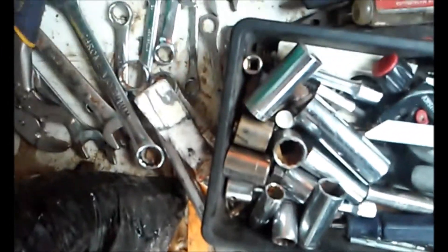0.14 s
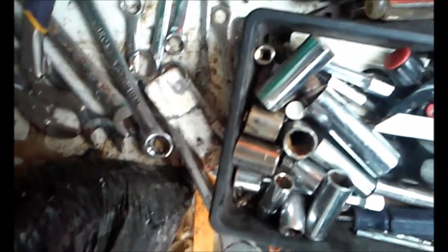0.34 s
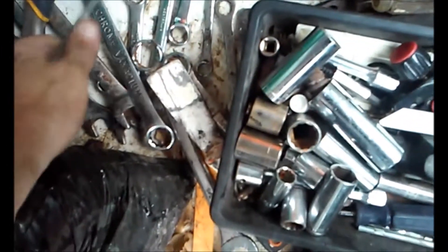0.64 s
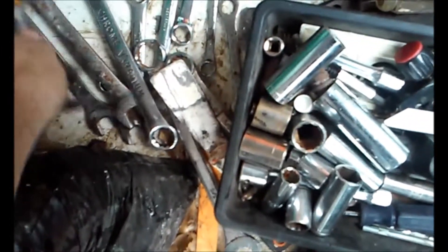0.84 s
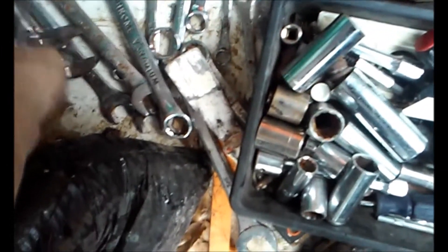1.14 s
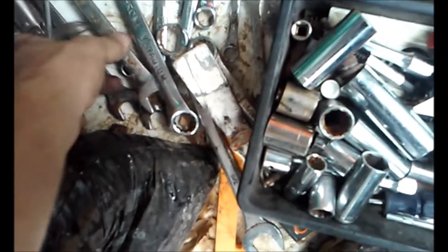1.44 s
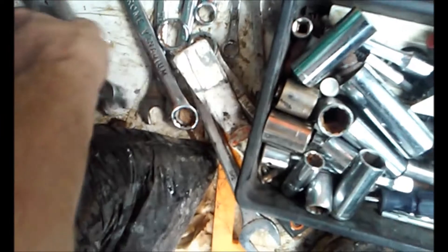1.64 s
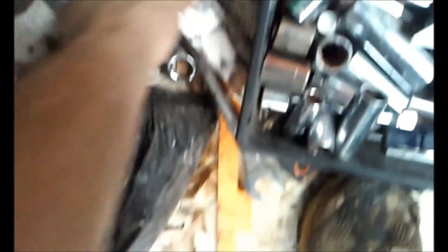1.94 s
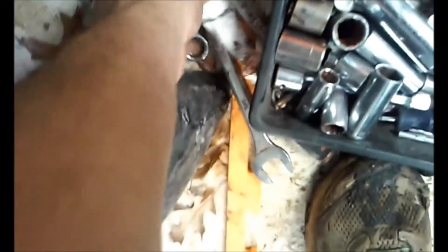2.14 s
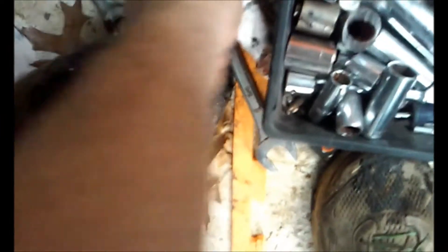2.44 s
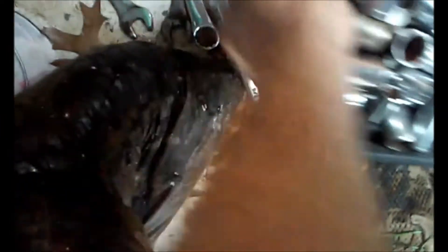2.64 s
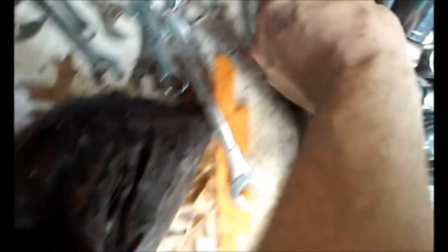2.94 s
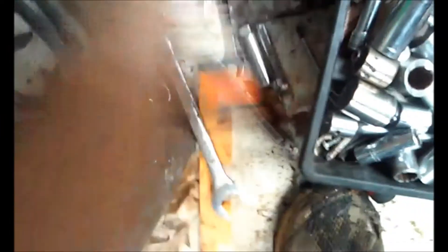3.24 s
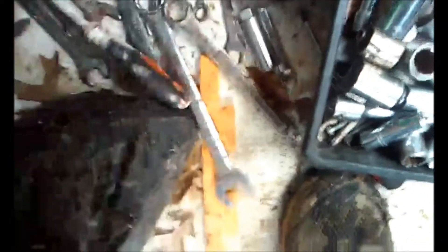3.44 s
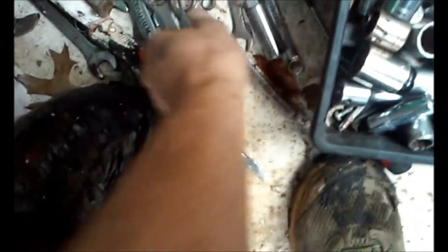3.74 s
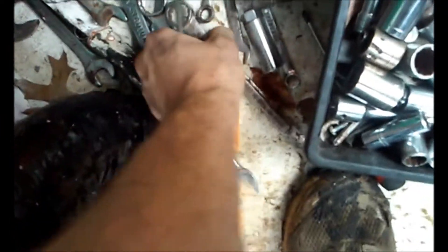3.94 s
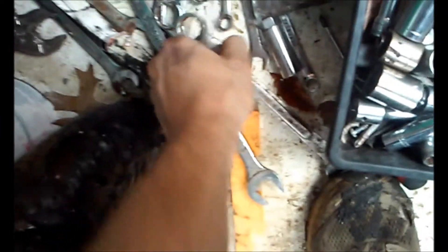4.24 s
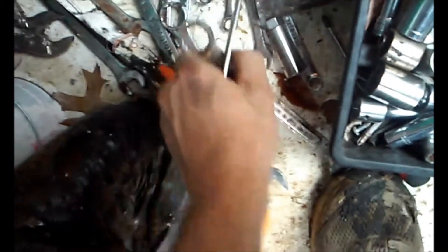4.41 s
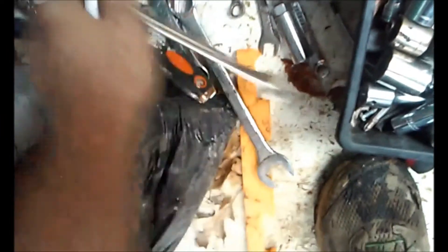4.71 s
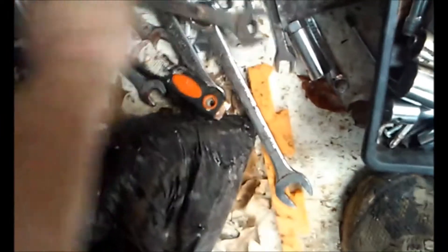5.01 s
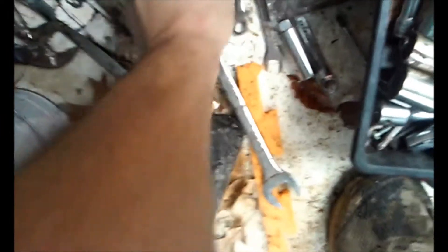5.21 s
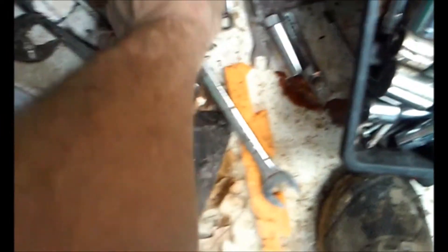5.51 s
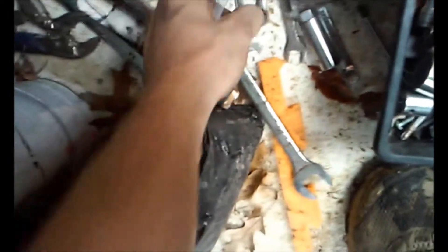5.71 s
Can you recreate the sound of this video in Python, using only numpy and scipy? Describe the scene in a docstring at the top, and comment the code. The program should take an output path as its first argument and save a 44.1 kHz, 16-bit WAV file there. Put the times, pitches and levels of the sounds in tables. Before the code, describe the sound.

After a dull wooden knock, metal tools jingle sparsely, crash against a shoved plastic tray, then ring louder in dense bursts towards the end.

```python
"""Rummaging through steel tools

A hand sets down a wooden block, then rummages through steel wrenches and a plastic tray of sockets on a garage floor.
Clinks are decaying sine modes plus chatter of the pile; the block, knocks and thumps are noise bursts through
resonances; the tray grinds with coloured grit and dragged sockets squeal in gliding bands.
A small mono microphone gates the quiet moments and overloads on the loudest clinks."""
import sys
import numpy as np
from scipy import signal
from scipy.fft import rfft, irfft
from scipy.io import wavfile
from scipy.ndimage import minimum_filter1d

SR = 44100
rng = np.random.default_rng(int(sys.argv[2]) if len(sys.argv) > 2 else 0)


def wrap_up_sound(samples):
    """Save the sound to the file named by the first command line argument, as 16-bit audio."""
    columns = np.atleast_2d(samples).T
    # keep every value between -1 and 1, then stretch to whole-number steps
    tamed = np.clip(columns, -1, 1)
    steps = np.round(tamed * 32767).astype(np.int16)
    wavfile.write(sys.argv[1], SR, steps)


N = 258867

# knocks on tray and floor: start_s, level_db, body_pitch_hz, t60_s
KNOCK_EVENTS = [(0.756, -30, 617, 0.065), (0.76, -25, 1780, 0.27), (0.9, -20, 1440, 0.066),
                (1.577, -25.5, 2560, 0.5), (1.692, -22.5, 1310, 0.16), (1.872, -9, 2840, 0.27),
                (1.902, -25, 2650, 0.05), (2.127, -16, 2640, 0.03), (2.155, -3, 825, 0.062),
                (2.212, -18, 2000, 0.057), (2.276, -15.5, 1185, 0.028), (2.352, -15, 1080, 0.033),
                (2.374, -22, 1570, 0.089), (2.385, -4, 896, 0.039), (2.423, -22, 1300, 0.019),
                (2.473, -26.5, 1505, 0.031), (2.502, -25, 1300, 0.041), (2.526, -26.5, 1200, 0.045),
                (2.551, 2, 1110, 0.074), (2.591, -8.5, 1490, 0.18), (2.616, -8, 1500, 0.038),
                (2.64, -8.5, 780, 0.08), (2.655, -12.5, 1820, 0.027), (2.694, -19.5, 1480, 0.085),
                (2.738, 9, 820, 0.16), (2.764, -5, 850, 0.29), (2.787, 9, 630, 0.066),
                (2.837, 5.5, 1650, 0.043), (2.849, -3, 1500, 0.039), (2.864, 9.5, 750, 0.025),
                (2.891, 2.5, 1820, 0.017), (2.933, 0.5, 1750, 0.027), (3.007, -9, 1670, 0.035),
                (3.024, -8, 2550, 0.033), (3.037, -12.5, 800, 0.071), (3.0603, 3, 1090, 0.078),
                (3.093, -3.5, 1816, 0.023), (3.142, -10.5, 1600, 0.052), (3.347, -23, 2430, 0.15),
                (3.445, -18.5, 1224, 0.13), (3.466, 0.5, 1905, 0.045), (3.573, -9.5, 2510, 0.042),
                (3.94, -35.5, 1100, 0.13), (4.007, -16.5, 1742, 0.061), (4.618, -2, 742, 0.074),
                (4.865, -8, 1750, 0.44), (4.897, -5, 1790, 0.042), (5.319, -4.5, 1800, 0.065),
                (5.37, -14.5, 1740, 0.047), (5.44, -21, 2500, 0.11), (5.771, -17, 940, 0.017),
                (5.819, -4, 2180, 0.18)]
# colour of the plastic tray: freq_hz, relative_level_db
TRAY_COLOUR = [(150, -66), (250, -27.5), (379, -36.5), (480, -12.5), (595, 4.5), (886, 2.5), (1190, 5),
               (1440, 6.5), (2640, 4.5), (4370, -16), (6860, -20.5), (15800, -35.5)]
# colour of garage air and microphone noise: freq_hz, relative_level_db
HUSH_COLOUR = [(15, -33), (25, 0.5), (268, -8.5), (307, -22), (436, -22), (1550, -16), (3390, -22),
               (8250, -14.5), (15800, -25)]


def amp(db):
    """Amplitude factor of a level in dB."""
    return 10 ** (np.asarray(db) / 20)


def rms_one(x):
    """Scale to rms 1."""
    return x / np.sqrt(np.mean(x ** 2) + 1e-20)


def coloured(x, spectrum):
    """Minimum-phase filter with the given (Hz, dB) shape: nothing sounds early."""
    hz, db = np.transpose(spectrum)
    grid_hz = np.maximum(np.arange(1025) * SR / 2048, 1)
    log_gain = np.log(amp(np.interp(np.log(grid_hz), np.log(hz), db)))
    cepstrum = irfft(log_gain)
    # fold the cepstrum onto positive time
    cepstrum[1:1024] *= 2
    cepstrum[1025:] = 0
    impulse = irfft(np.exp(rfft(cepstrum)))
    return signal.fftconvolve(x, impulse)[:N]


def resonance(x, hz, width_hz):
    """Two-pole band-pass with gain 1 on top."""
    r = np.exp(-np.pi * width_hz / SR)
    zeros = np.array([1, 0, -1]) * (1 - r * r) / 2
    poles = [1, -2 * r * np.cos(2 * np.pi * hz / SR), r * r]
    return signal.lfilter(zeros, poles, x)


def add(out, start_s, x):
    """Mix x into out from start_s."""
    i = round(start_s * SR)
    out[i:i + len(x)] += x[:N - i]


def decay(t60_s, count):
    """Exponential fall over count samples."""
    return amp(-60 * np.arange(count) / SR / t60_s)


def grains(per_s, spread_db):
    """Random contacts of uneven size and sign."""
    sizes = amp(spread_db * np.minimum(rng.exponential(1, N), 5))
    sizes = sizes * rng.choice([-1, 1], N)
    return sizes * (rng.random(N) < per_s / SR) + 1e-18


def struck(start_s, level_db, favoured_hz, grip, chance):
    """The heap in reach rings in all its modes, most near the pitch that the blow favours, then is cut short."""
    # one row of modes per heap, in the order reached: mode_hz
    heap_modes = [(6570, 7473, 9050, 9502, 11586, 13621), (6808, 7940, 9431),
                  (5083, 6690, 7270, 9292, 9455, 12039, 13170, 14856), (5019, 6647, 9379, 13178),
                  (3657, 5289, 6274, 7297, 9496, 10829, 11653, 12050, 14030, 14853),
                  (4453, 5006, 5811, 1588, 8956, 9438, 9649, 10746, 3058, 15331),
                  (2151, 3052, 4001, 5823, 7064, 7699, 9642, 10520, 10770, 14355, 14580, 15346),
                  (2600, 5123, 7700, 9642, 10539), (3068, 3661, 4016, 6571, 6726, 7244, 8969),
                  (4272, 5504, 6558, 7298, 8510, 8951, 9331, 9492, 4010, 11103, 4650, 2050),
                  (7294, 9493, 13425), (3780, 5733, 7450, 7692, 8244, 8500), (13502,), (7345, 11018, 14219),
                  (5439, 5750, 5924, 13502), (7127,),
                  (1050, 3458, 3784, 4909, 5702, 7449, 7708, 7947, 8494, 8804, 9492, 11077, 13762),
                  (6419, 10671, 11607, 13794), (2181, 3700, 7453, 9300, 9458),
                  (5505, 5723, 7459, 7842, 8497, 9002, 10669, 15131), (2186, 3660, 5131, 6266, 9342),
                  (1251, 2509, 2705), (2538, 3779, 6239, 7451, 9488, 10442, 11648),
                  (5726, 6726, 7698, 8494, 10664, 12358),
                  (5152, 6575, 7247, 7696, 8426, 11280, 11701, 12361, 12669),
                  (2900, 5700, 6254, 6726, 7930, 13785, 15207),
                  (4347, 7248, 7703, 7930, 8886, 10556, 11812),
                  (1764, 2692, 3648, 4396, 5733, 6245, 7461, 9491, 11270, 12690, 13770),
                  (2906, 4322, 5556, 6283, 7621, 9489, 10758, 11792, 12679, 13288, 15223),
                  (3797, 5707, 6256, 7463, 7684, 8550, 9494, 10673, 11268, 11627, 13761, 15199)]
    # the same modes: level_db, t60_s
    heap_rings = [
        [(2.5, 0.12), (7.5, 0.2), (2, 0.11), (1.5, 0.19), (1, 0.15), (8.5, 0.16)],
        [(1.5, 0.044), (-8, 0.15), (-16, 0.15)],
        [(3.5, 0.061), (4.5, 0.14), (2.5, 0.079), (-3, 0.1), (4.5, 0.093), (-1.5, 0.13), (-1, 0.15),
         (-6, 0.089)],
        [(-4, 0.13), (5, 0.062), (-16, 0.24), (-5, 0.14)],
        [(-9.5, 0.11), (1, 0.069), (-14.5, 0.38), (-1, 0.15), (-5, 0.2), (-10, 0.15), (-10, 0.082), (-7, 0.14),
         (-10, 0.13), (-8, 0.2)],
        [(-16.5, 0.12), (-2.5, 0.27), (0, 0.38), (-17, 0.67), (-14.5, 0.87), (5.5, 0.16), (-9, 0.08),
         (-7, 0.24), (-11.5, 0.35), (1, 0.12)],
        [(-16, 1.6), (-22, 1), (-7, 0.79), (-3.5, 0.045), (-8.5, 0.18), (-1, 0.15), (-2, 1.4), (-12.5, 0.34),
         (7.5, 0.14), (1, 0.13), (-3, 0.042), (8.5, 0.12)],
        [(-25, 0.12), (-3, 0.44), (0, 0.16), (-22.5, 0.56), (-18.5, 0.38)],
        [(-23, 0.35), (-6.5, 0.062), (-8.5, 0.073), (2, 0.15), (-19, 0.12), (-15.5, 0.72), (-10, 0.32)],
        [(-3.5, 0.14), (-7.5, 0.4), (5, 0.15), (-7, 0.27), (4, 0.14), (-26.5, 0.41), (-13, 0.88), (1, 0.22),
         (-17.5, 0.21), (-17, 0.9), (-23.5, 0.21), (-15.5, 0.26)],
        [(-20, 0.36), (-18, 0.58), (7, 0.087)],
        [(-12.5, 0.75), (10, 0.31), (-14.5, 0.15), (0.5, 0.24), (-6, 0.11), (9.5, 0.31)],
        [(0, 0.12)],
        [(-10.5, 0.085), (-6.5, 0.19), (-4.5, 0.52)],
        [(0, 0.091), (-19, 0.81), (-8, 0.13), (-16, 0.075)],
        [(0, 0.066)],
        [(-9.5, 0.41), (1.5, 0.24), (-2, 0.3), (-13, 0.31), (0.5, 0.23), (-6.5, 0.6), (-1.5, 0.42), (-7, 0.155),
         (-16.5, 0.19), (-15, 0.13), (-12, 0.88), (2.5, 0.16), (-9, 0.22)],
        [(1, 0.14), (-13.5, 0.29), (-5, 0.17), (-17, 0.284)],
        [(-18.5, 0.31), (-8, 0.07), (-11, 0.19), (5.5, 0.1), (-3, 0.17)],
        [(-10, 0.68), (-2.5, 0.27), (-23, 0.2), (-7, 0.23), (-25, 0.23), (-24, 0.43), (-11, 0.34), (-20, 0.47)],
        [(-3.5, 0.15), (4, 0.08), (-8.5, 0.21), (4, 0.074), (-14, 0.37)],
        [(-8, 0.091), (-3, 0.13), (8, 0.036)],
        [(0.5, 0.24), (-5, 6.1), (6, 0.078), (-18, 1.1), (-20, 0.53), (-21, 0.31), (-17, 0.029)],
        [(1, 0.28), (-12.5, 0.074), (3.5, 0.24), (-26, 0.46), (-19, 0.84), (4.5, 0.18)],
        [(-18.5, 0.71), (2, 0.23), (-2, 0.17), (-1, 0.23), (0, 0.39), (-4.5, 0.46), (-5, 0.45), (-2.5, 0.19),
         (-5, 0.34)],
        [(-2.5, 0.56), (-4.5, 0.29), (9, 0.17), (-3, 0.19), (-0.5, 0.98), (3.5, 0.11), (9.5, 0.096)],
        [(-3, 0.15), (-19, 0.068), (5.5, 0.14), (-17, 0.58), (-8, 0.44), (-5, 0.22), (-6, 0.2)],
        [(-14, 0.17), (7.5, 0.063), (-8.5, 0.34), (-1, 0.27), (8.5, 0.097), (1.5, 0.2), (-24, 0.53),
         (-22.5, 2.2), (-11, 0.84), (-5.5, 0.48), (-21, 0.7)],
        [(-8, 0.12), (-0.5, 0.13), (-3, 0.15), (7, 0.078), (-13, 0.19), (-2, 0.27), (-13, 0.66), (-10.5, 0.32),
         (2.5, 0.088), (-11, 0.061), (-17, 0.52)],
        [(-14, 0.98), (-1, 0.53), (-2, 4), (0, 0.43), (2, 0.06), (11, 0.083), (-1, 0.27), (0.5, 0.38),
         (-7.5, 0.38), (6.5, 0.14), (-4, 0.13), (8.5, 0.086)],
    ]
    # the hand reaches each heap; its ringing is cut short at its end time, by touch or by the gate:
    # reached_s, ring_end_s
    handled = [(-1, .2), (.5, .56), (.7, 1.0), (.99, 1.08), (1.16, 1.28), (1.5, 1.8), (1.78, 1.87),
               (1.86, 2.5), (1.9, 2.5), (2.17, 2.5), (2.38, 2.55), (2.54, 2.68), (2.61, 2.72), (2.76, 3.02),
               (3.06, 3.19), (3.3, 3.41), (3.44, 3.79), (3.78, 3.87), (3.86, 4.05), (4.04, 4.4),
               (4.27, 4.41), (4.5, 4.57), (4.76, 4.92), (4.83, 4.95), (4.92, 5.19), (4.95, 5.125),
               (5.18, 5.3), (5.26, 5.45), (5.44, 5.76), (5.74, 6)]
    stagger_s, attack_s = 0.0008, 0.0014

    reached_s, ring_end_s = np.transpose(handled)
    heap = np.searchsorted(reached_s, start_s) - 1
    hz = np.ravel(heap_modes[heap])
    mode_db, t60_s = np.transpose(heap_rings[heap])
    level_chance, phase_chance, beat_chance = chance[:, :len(hz)]

    octaves_off = np.minimum(np.abs(np.log2(hz / favoured_hz)), .35)
    strength = amp(mode_db - 14 * octaves_off + 0.76 * level_chance)
    t60_s = t60_s * np.clip(grip, .1, 3)
    free_s = max(ring_end_s[heap] - start_s, .02)
    t = np.arange(int(SR * min(t60_s.max(), free_s + 0.083))) / SR

    rings = np.sin(2 * np.pi * hz[:, None] * t + 2 * phase_chance[:, None])
    rings *= amp(-60 * t / t60_s[:, None])
    # each mode throbs as it dies; long rings stay purer
    throb_depth = np.minimum(.5, 0.12 / t60_s[:, None])
    throb = np.sin(2 * np.pi * 45 * beat_chance[:, None] * t + 2 * level_chance[:, None])
    rings *= 1 + throb_depth * throb
    # the pieces are not all hit at once
    late_s = stagger_s * np.abs(phase_chance[:, None])
    rings *= 1 - np.exp(-np.maximum(t - late_s, 0) / attack_s)

    cut = amp(-1200 * np.maximum(t - free_s, 0))   # dB per s
    return amp(level_db) * cut * ((strength / np.sum(strength)) @ rings)


def clinks():
    """Ringing modes for every clink, and how hard clinks and knocks stir the pile."""
    # steel on steel: start_s, ring_level_db, favoured_pitch_hz, crack_level_db, ring_time_left_by_grip (factor)
    clink_events = [(0.526, -30.5, 6850, -41, 0.85), (0.7777, -39, 3520, -23, 0.8),
                    (0.798, 5, 6510, -8, 0.67), (0.8444, 5, 7800, -4, 1), (0.903, -2, 6660, -6, 0.42),
                    (0.9982, -8, 6640, -15, 1), (1.0106, -0.5, 13700, -41, 0.46),
                    (1.163, -13, 14000, -26, 0.97), (1.2167, -3, 9580, -22, 0.4),
                    (1.564, -22, 9000, -23.5, 0.98), (1.5832, -20, 7900, -3, 0.27),
                    (1.6356, -3.5, 5860, -23, 0.083), (1.6557, -0.5, 9440, -11.5, 0.26),
                    (1.697, -22, 5820, -15.5, 0.83), (1.7838, 6.5, 14200, -12, 1),
                    (1.844, -4, 7660, -3, 0.66), (1.8677, 12, 7960, -3.5, 1), (1.9044, 13.5, 6440, 4, 0.69),
                    (1.9294, 5.5, 6500, -19, 0.38), (2.052, -9.5, 6600, -33, 0.15),
                    (2.178, -20, 3440, -27, 1), (2.216, -5.5, 6930, -15, 0.86),
                    (2.2436, -3.5, 6630, -25, 0.2), (2.423, -13, 13660, -52, 0.41),
                    (2.5538, -16, 6140, -14.5, 0.62), (2.616, 11.5, 13500, -16, 0.15),
                    (2.8113, -21.5, 11000, -33, 0.99), (3.005, -44, 7650, -20, 0.63),
                    (3.0922, -15, 5400, -26.5, 0.33), (3.352, -37, 8660, -23, 0.72),
                    (3.447, -14.5, 5650, -17.5, 0.96), (3.465, -8.5, 7930, -3, 0.89),
                    (3.5741, -4.5, 5810, -16.5, 0.11), (3.791, -9, 6280, -11.5, 0.76),
                    (3.8095, 4, 6400, -18, 0.11), (3.867, -2, 9330, -7, 0.77),
                    (3.9717, -37, 7530, -20.5, 0.6), (4.008, 8.5, 9300, -10.5, 0.15),
                    (4.054, -9.5, 7850, -21.5, 0.76), (4.2797, -27.5, 5530, -43, 0.32),
                    (4.298, -14, 6260, -37, 0.36), (4.534, -18.5, 4350, -44.5, 0.6),
                    (4.775, -41.5, 6210, -20, 0.88), (4.7988, -3, 6370, -5.5, 1),
                    (4.8124, 0, 6250, -4.5, 0.89), (4.838, 4.5, 7800, -2, 0.83),
                    (4.8742, -9, 3830, -1, 0.85), (4.8994, -7, 7710, -1.5, 0.87), (4.9247, 17, 8050, 1, 1),
                    (4.9556, 14, 6000, -22, 1), (5, 3, 8200, -29, 0.54), (5.19, 4.5, 7600, 0, 0.81),
                    (5.2661, -1.5, 5700, -11, 0.64), (5.3078, 6, 6140, -6.5, 0.22),
                    (5.446, -15.5, 5600, -14.5, 1), (5.492, 6, 5590, -7.5, 0.24),
                    (5.526, -7, 7860, -9, 0.57), (5.5347, 3, 12600, -7, 1), (5.559, 3.5, 6450, -6, 0.57),
                    (5.575, 1.5, 6300, -41, 0.35), (5.73, -1.5, 9450, -43, 0.21),
                    (5.745, -7, 8500, -32, 0.25), (5.7688, 13, 8350, -9.5, 0.51),
                    (5.8187, 14, 6550, 10.5, 0.99), (5.8447, 20, 7700, 4, 0.63)]
    first_ring_db, first_chatter_db = -31, -36.5
    tick_db, tick_t60_s = -27, 0.01

    rings, stir = np.zeros(N), np.zeros(N)
    chance = rng.standard_normal((len(clink_events) + 1, 3, 16))
    # the contact itself, then chatter that dies within moments
    contact = decay(0.0013, count=5000) + 0.32 * decay(0.11, count=5000)
    # steel already sounds at the start
    add(rings, 0, struck(0, first_ring_db, 7600, 1.6, chance[-1]))
    add(stir, 0, amp(first_chatter_db) * contact)
    for (start_s, level_db, hz, crack_db, grip), event_chance in zip(clink_events, chance):
        add(rings, start_s, struck(start_s, level_db, hz, grip, event_chance))
        add(stir, start_s, amp(crack_db) * contact)
    # the hard edge of each knock jolts the steel
    for start_s, level_db, *_ in KNOCK_EVENTS:
        add(stir, start_s, amp(level_db + tick_db) * decay(tick_t60_s, count=1000))
    return rings, stir


def sliding():
    """Tools slide over one another: how hard they stir the pile, and the gritty grind of the tray."""
    # level curves: time_s, steel_rattle_db, tray_grind_db
    slide_levels = [(1.55, -77.5, -71), (1.6, -51, -57), (1.95, -43, -41.5), (2.1, -65, -70),
                    (2.17, -33, -35.5), (2.3, -61, -58), (2.722, -71, -48.5), (2.75, -18.5, -15.5),
                    (2.9, -66.5, -34.5), (3.179, -61, -58.5), (3.22, -76.5, -99.5), (4.76, -61.5, -88),
                    (4.92, -6.5, -19.5), (5.05, -16.5, -54), (5.17, -47, -51.5), (5.4, -55, -45),
                    (5.47, -35.5, -50), (5.66, -39, -49), (5.87, -16, -38)]
    time_s, rattle_db, grind_db = np.transpose(slide_levels)
    t = np.arange(N) / SR
    rattle = amp(np.interp(t, time_s, rattle_db))
    grit = rms_one(coloured(grains(per_s=1400, spread_db=4.5), TRAY_COLOUR))
    return rattle, amp(np.interp(t, time_s, grind_db)) * grit


def pile(stir):
    """Tiny contacts, as strong as the stirring, dealt to the many modes of the whole pile."""
    # colour of the contacts: freq_hz, relative_level_db
    crack_colour = [(88, -59.5), (150, -8), (217, 0.5), (382, -37), (954, -13.5), (1550, -13),
                    (3250, -10.5), (7820, 1.5), (10100, -6.5), (15800, -9)]
    loose_width_hz, loose_db = 8.8, 12   # width at 9 kHz

    # pieces bounce, so the chatter comes in lumps
    jolts = resonance(rng.standard_normal(N), hz=70.6, width_hz=130)
    stir = stir * amp(3.0 * rms_one(jolts))
    contacts = stir * rms_one(coloured(grains(per_s=11000, spread_db=1.5), crack_colour))

    # short modes: every 11 ms other pieces may touch
    short_hz = np.geomspace(1500, 15300, 64) * (1 + 0.012 * rng.standard_normal(64))
    short_turn = np.repeat(rng.integers(0, 4, N // 500 + 1), 500)[:N]
    short = np.zeros(N)
    for k, hz in enumerate(short_hz):
        dealt = contacts * (short_turn == k % 4) + 1e-18
        short += resonance(dealt, hz, width_hz=0.008 * hz + 15)

    # loose pieces ring on, the high ones longest
    loose_hz = np.linspace(1200, 15400, 100) * (1 + 0.01 * rng.standard_normal(100))
    loose_turn = np.repeat(rng.integers(0, 10, N // 900 + 1), 900)[:N]
    loose = np.zeros(N)
    for k, hz in enumerate(loose_hz):
        dealt = contacts * (loose_turn == k % 10) + 1e-18
        loose += resonance(dealt, hz, loose_width_hz * 9000 / hz)
    return amp(loose_db) * loose + 2.39 * short + 0.15 * contacts


def air():
    """Garage air: steady coloured noise, ahead of the gate."""
    air_db = -58.5
    return amp(air_db) * rms_one(coloured(rng.standard_normal(N), HUSH_COLOUR))


def garage(x):
    """Diffuse echoes: noise that dies away, starting a few ms late."""
    t60_s, level_db = 0.15, -13.5
    tail = rng.standard_normal(SR // 2) * decay(t60_s, count=SR // 2)
    tail[:300] = 0
    tail /= np.sqrt(np.sum(tail ** 2))
    return amp(level_db) * signal.fftconvolve(x, tail)[:N]


def thud():
    """A wooden block lands: a rough low-passed push rumbles in its resonances."""
    # the landing: level_db, t60_s, build_up_t60_s
    landing = (-12.5, 0.22, 0.1)
    # resonances of the block: freq_hz, relative_level_db
    block_modes = [(258, -0.5), (522, 0), (690, -6.5), (877, 5.5), (1160, 6.5), (1290, -13), (1550, -17),
                   (1920, -26.5)]
    start_s, width_hz = .072, 78

    level_db, t60_s, build_s = landing
    push = rng.standard_normal(12000)
    push *= decay(t60_s, count=12000) - decay(build_s, count=12000)
    push = signal.sosfilt(signal.butter(10, 2400, fs=SR, output="sos"), push)
    block = sum(amp(mode_db) * 4 * resonance(push, hz, width_hz) for hz, mode_db in block_modes)
    out = np.zeros(N)
    add(out, start_s, amp(level_db) * block)
    return out


def knocks():
    """Bursts of grit through the body pitch of each knock on plastic or floor."""
    edge = 7   # first touch, against grit of rms 1
    top_ratio = 3.7   # low-pass edge over body pitch
    body = np.zeros(N)
    grit = rms_one(coloured(grains(per_s=4000, spread_db=3.5), TRAY_COLOUR))
    for start_s, level_db, hz, t60_s in KNOCK_EVENTS:
        i = round(start_s * SR)
        # soft plastic: the push builds up
        push = decay(t60_s, count=6000) - decay(0.009, count=6000)
        burst = grit[i:i + 6000] * push[:N - i]
        burst[0] += edge
        # twice: little leaks above the body
        tuned = resonance(resonance(burst, hz, width_hz=700), hz, width_hz=700)
        band = signal.butter(2, [400, top_ratio * hz], "band", fs=SR, output="sos")
        dull = signal.sosfilt(band, burst)
        add(body, start_s, amp(level_db) * (0.18 * dull + 0.42 * tuned))
    return body


def thumps():
    """The shoved tray rocks on the floor: resonant noise, plus a sinking tone in the lowest thumps."""
    # start_s, level_db, pitch_hz, t60_s
    thump_events = [(0.848, -37, 197, 0.2), (1.864, -25, 147, 0.38), (2.738, -3.5, 235, 0.13),
                    (2.749, -17, 108.4, 0.18), (2.797, -15.5, 94, 0.55), (3.023, -27, 221.4, 0.095),
                    (3.062, -15, 553, 0.078), (3.346, -32.5, 225, 0.11), (4.618, -24.5, 324, 0.045),
                    (4.899, -26.5, 151.3, 0.52), (5.82, -16.5, 160, 0.28)]
    sag_hz_per_s = 110
    body = np.zeros(N)
    shake, t = rng.standard_normal(N), np.arange(15000) / SR
    for start_s, level_db, hz, t60_s in thump_events:
        rough = 12 * resonance(shake[round(start_s * SR):][:15000], hz, width_hz=0.29 * hz)
        fall = decay(min(t60_s, .7), count=15000)
        tone = np.sin(2 * np.pi * (hz - sag_hz_per_s * t / 2) * t)
        tone *= (1 - np.exp(-t / 0.0039)) * (hz < 125)
        mixed = tone[:len(rough)] + .5 * rough
        add(body, start_s, amp(level_db) * fall[:len(rough)] * mixed)
    return body


def drag():
    """Sockets dragged over the tray squeal: narrow bands of grit that glide in pitch."""
    # start_s, length_s, from_hz, to_hz, width_hz, level_db
    drag_events = [(2.15, .055, 2200, 3600, 300, -27), (4.148, .07, 2300, 2200, 300, -48),
                   (4.297, .09, 2500, 2250, 500, -34), (4.402, .04, 2350, 2250, 300, -44)]
    out = np.zeros(N)
    grit = grains(per_s=12000, spread_db=0.0)
    for start_s, length_s, from_hz, to_hz, width_hz, level_db in drag_events:
        t = np.arange(int(length_s * SR)) / SR
        low_pass = signal.butter(2, width_hz / 2, fs=SR, output="sos")
        rough = rms_one(signal.sosfilt(low_pass, grit[round(start_s * SR):][:len(t)]))
        mean_hz = from_hz + (to_hz - from_hz) * t / length_s / 2   # averaged since the start
        glide = np.sin(2 * np.pi * mean_hz * t)
        shape = np.sqrt(np.interp(t / length_s, [0, .15, 1], [0, 1, 0]))
        add(out, start_s, amp(level_db) * shape * rough * glide)
    return out


def scene():
    """All sources, with the garage around them, alike in both channels."""
    rings, stir = clinks()
    rattle, grind = sliding()
    near = rings + pile(stir + rattle) + grind + thud() + knocks() + thumps() + drag()
    return np.tile(near + garage(near) + air(), (2, 1))


def record(dry):
    """A gate holds briefly, then turns quiet sound far down; peaks clip, the top is cut."""
    gate_db, gate_slope_db_per_db, gate_depth_db = -43, 6.1, 22.5
    hush_db = -80   # before the low cut
    cutoff_hz = 16200

    r = np.exp(-1 / (0.0038 * SR))   # 3.8 ms level smoothing
    power = signal.lfilter([1 - r], [1, -r], dry[0] ** 2, zi=[np.mean(dry[0, :200] ** 2)])[0]
    level_db = 10 * np.log10(power + 1e-12)
    # running maximum holds the gate open for 18 ms
    held_db = -minimum_filter1d(-level_db, size=801, origin=400)
    gain = amp(np.clip((held_db - gate_db) * gate_slope_db_per_db, -gate_depth_db, 0))

    # noise behind the gate
    hush = amp(hush_db) * rms_one(coloured(rng.standard_normal(N), HUSH_COLOUR))
    hush = signal.lfilter(*signal.butter(1, 150, "high", fs=SR), hush)
    clipped = np.clip(dry * gain + hush, -.82, .82)
    return signal.sosfilt(signal.cheby2(14, 55, cutoff_hz, fs=SR, output="sos"), clipped)


dry = scene()
out = record(dry)
wrap_up_sound(out)
```